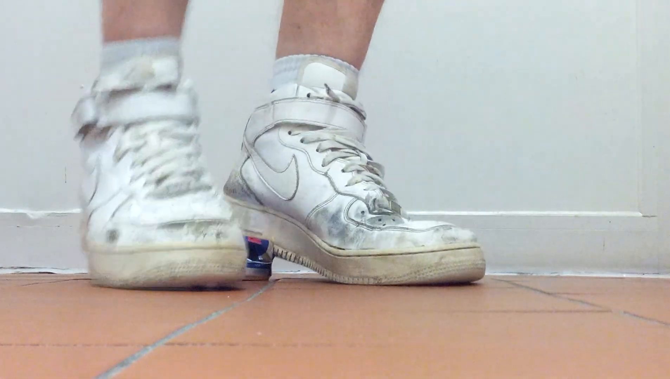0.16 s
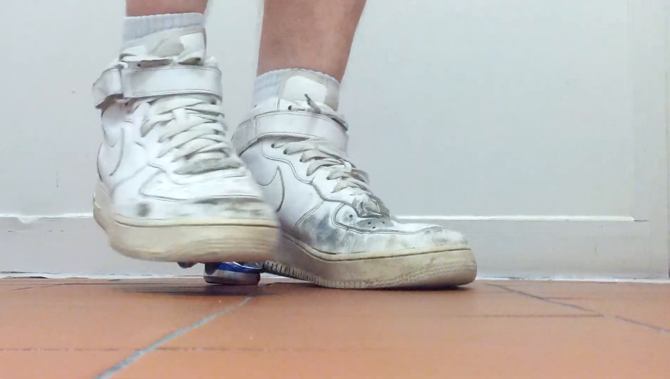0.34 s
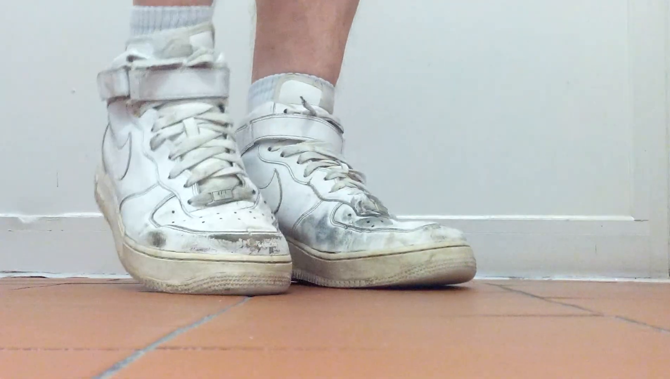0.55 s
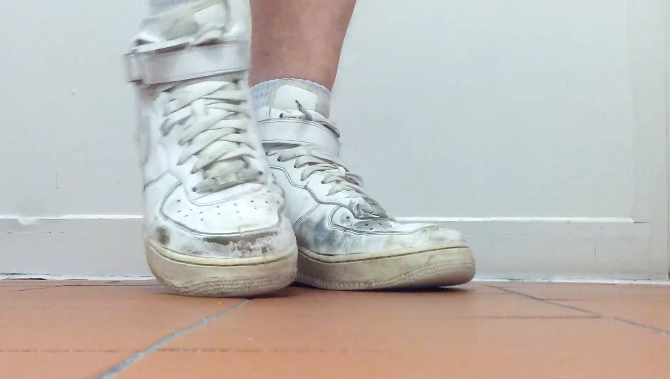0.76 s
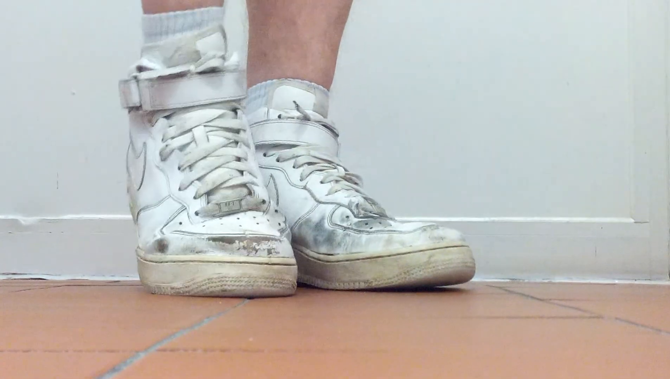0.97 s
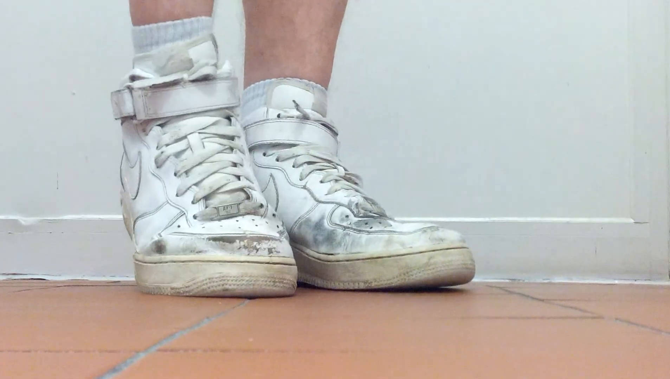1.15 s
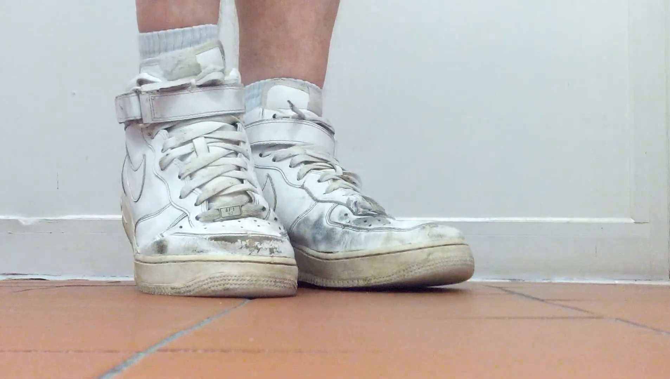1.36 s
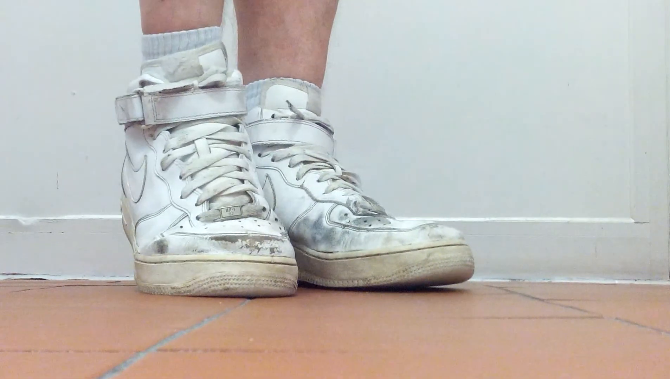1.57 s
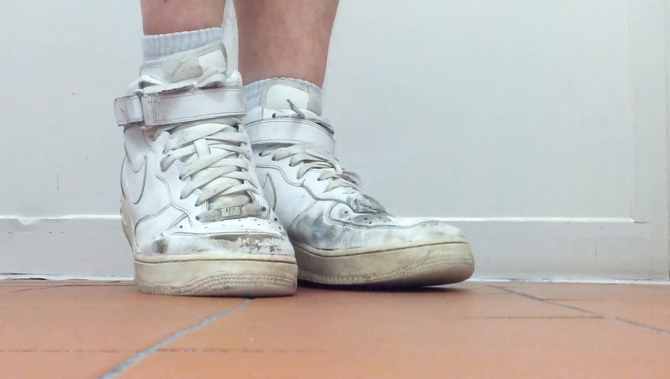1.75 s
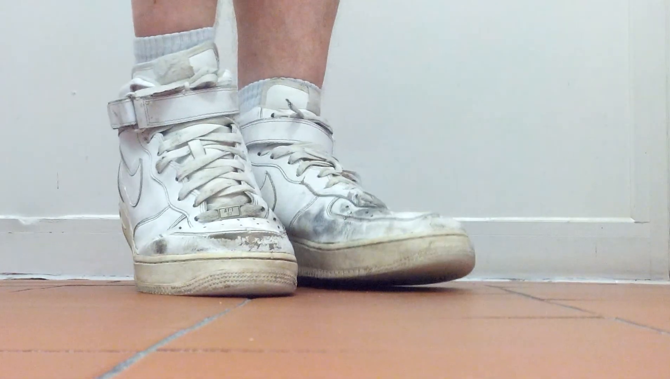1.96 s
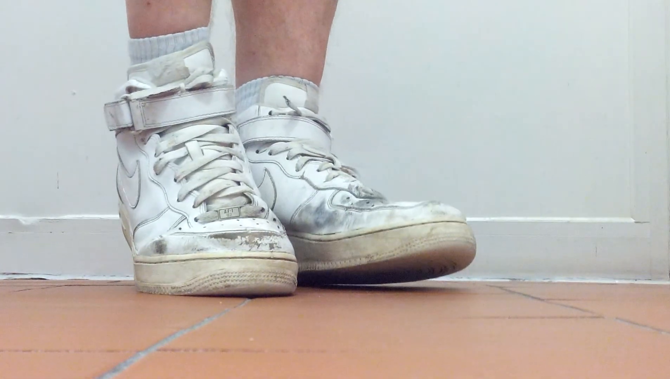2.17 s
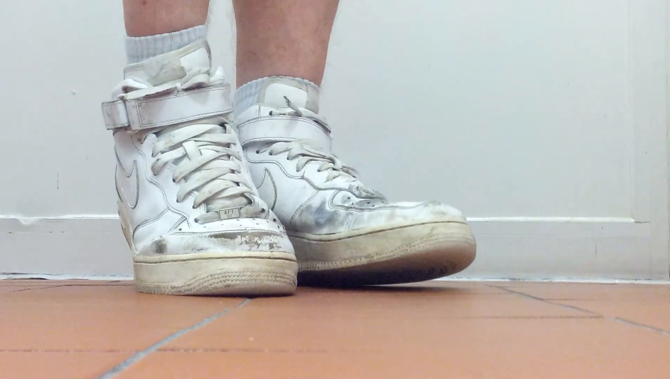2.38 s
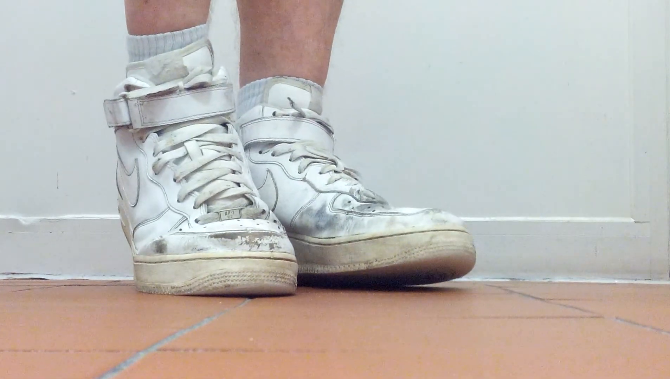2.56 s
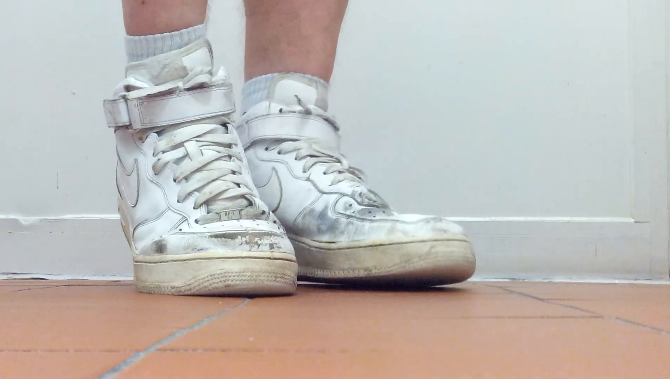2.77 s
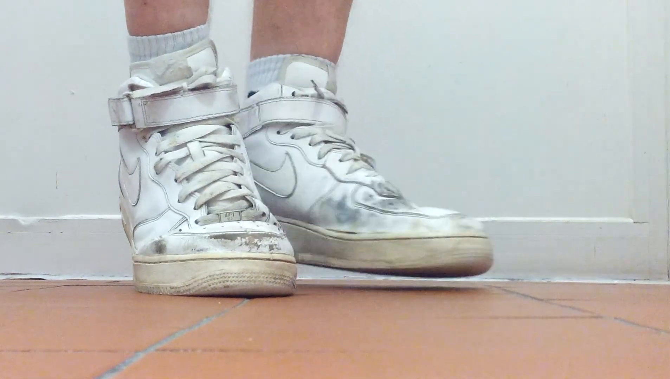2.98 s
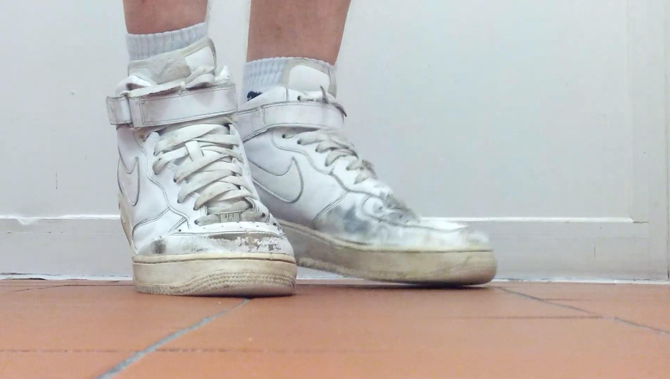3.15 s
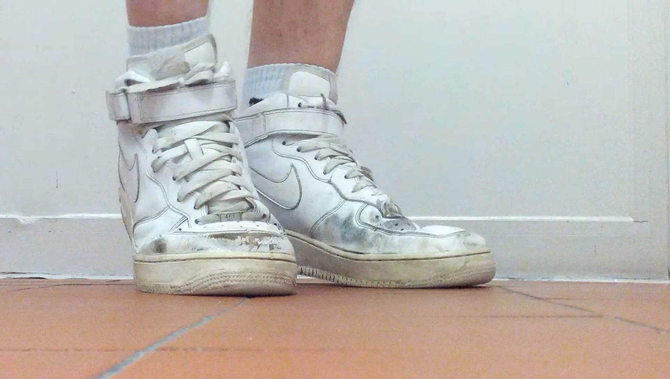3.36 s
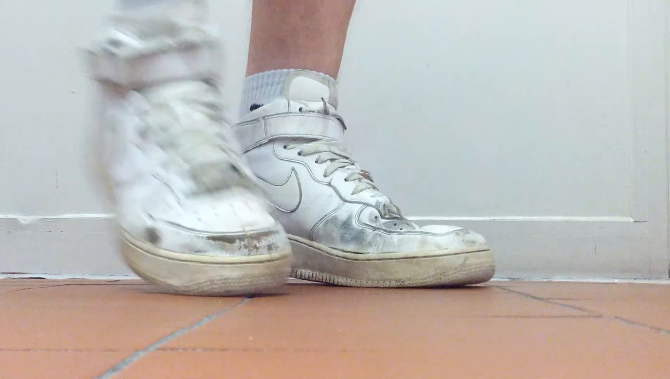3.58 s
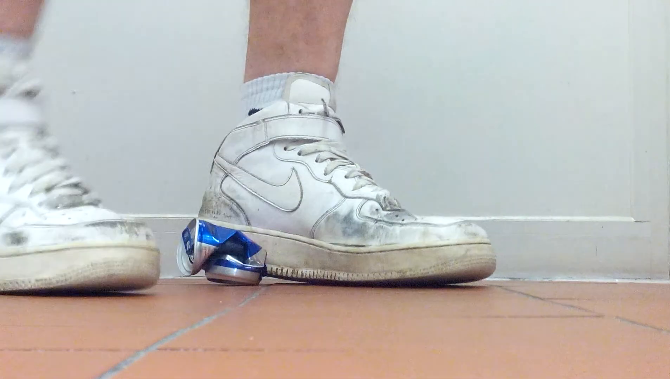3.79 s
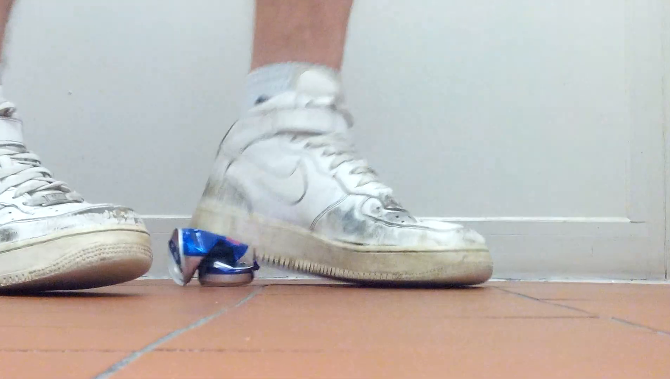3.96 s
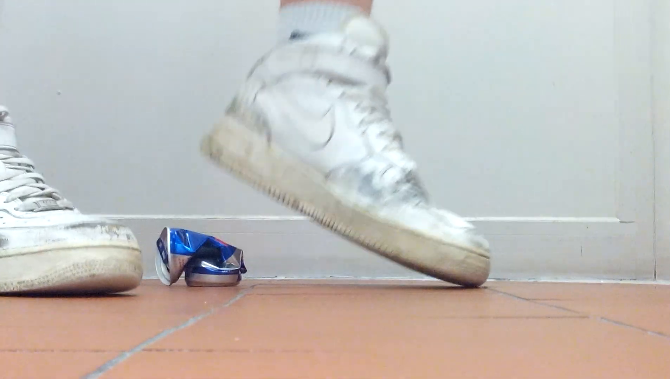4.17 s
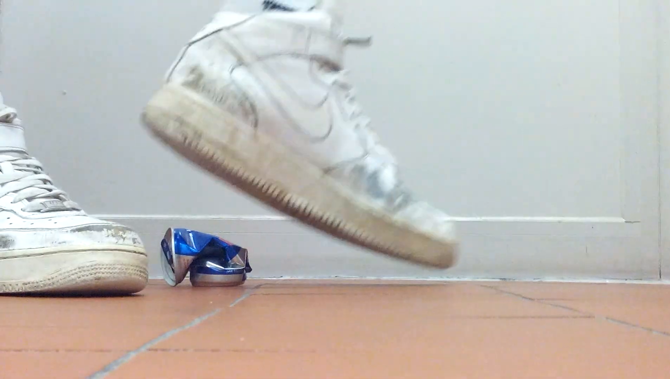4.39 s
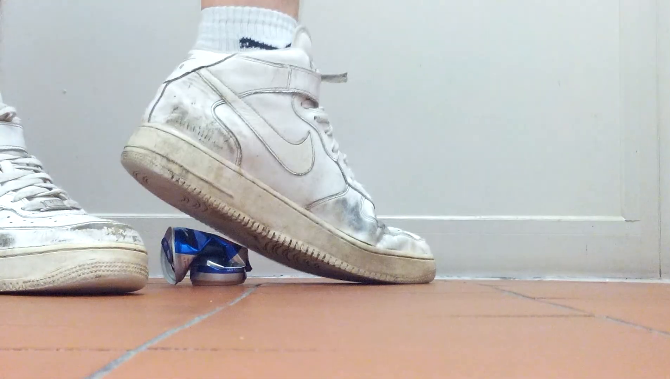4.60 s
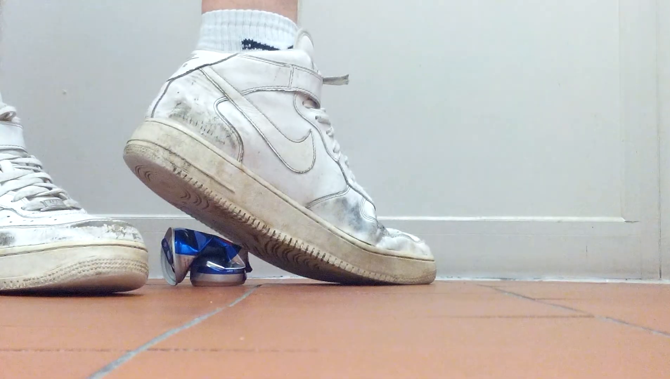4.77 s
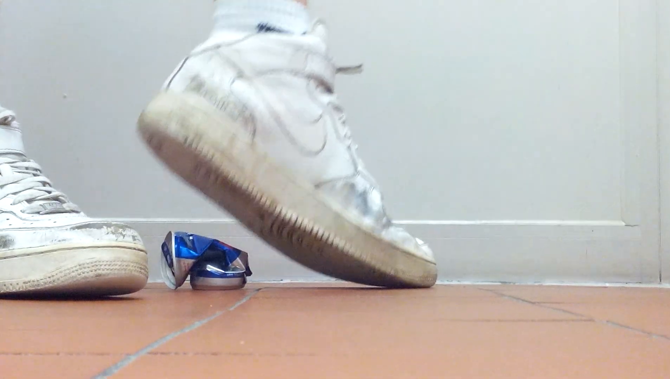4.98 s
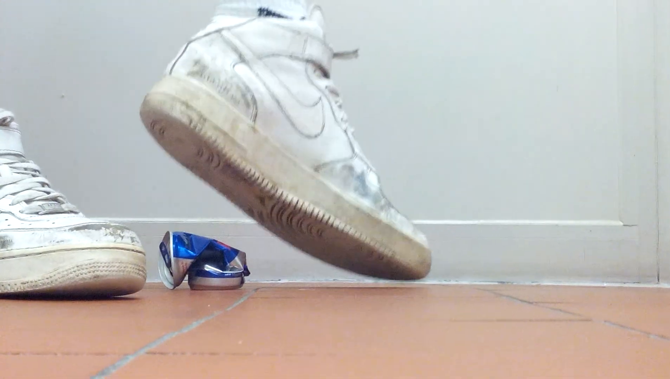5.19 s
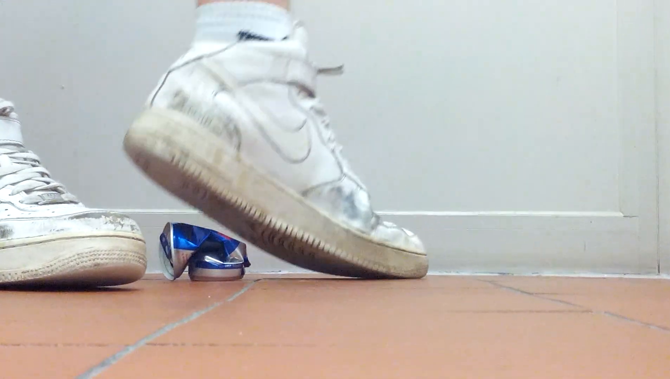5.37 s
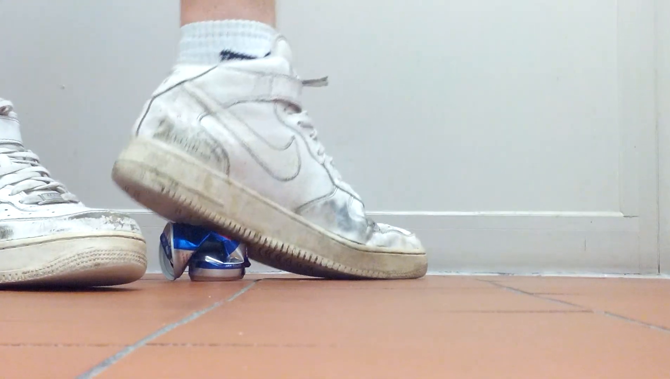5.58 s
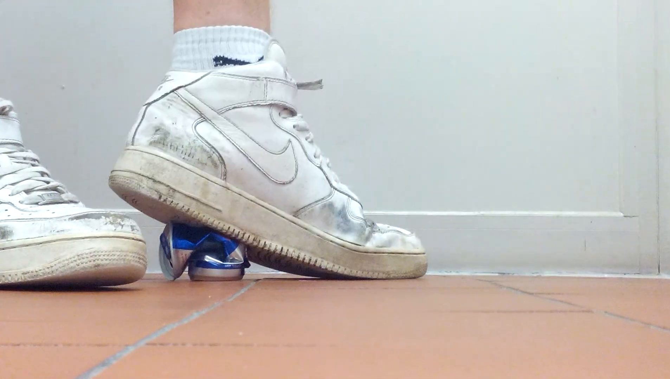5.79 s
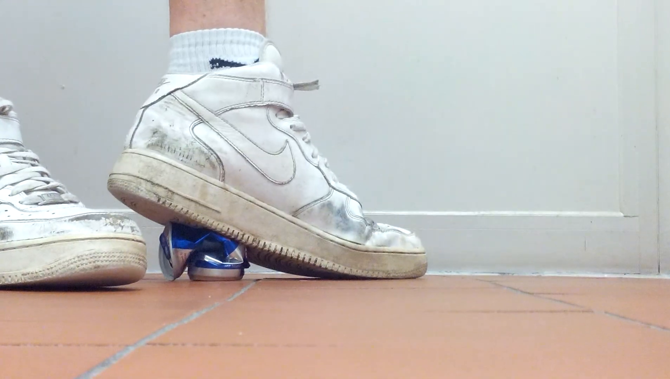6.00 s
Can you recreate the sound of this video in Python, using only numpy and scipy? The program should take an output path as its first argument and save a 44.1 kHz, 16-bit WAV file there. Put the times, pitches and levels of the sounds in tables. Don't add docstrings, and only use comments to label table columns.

```python
import sys
import numpy as np
from scipy import signal
from scipy.fft import rfft, irfft, next_fast_len
from scipy.io import wavfile
from scipy.ndimage import map_coordinates

SR = 44100
rng = np.random.default_rng(int(sys.argv[2]) if len(sys.argv) > 2 else 0)


def volts_from_decibels(level):
    exponent = np.asarray(level, float) / 20
    return 10 ** exponent


def output_pcm(signal):
    pcm = np.clip(np.atleast_2d(signal).T, -1, 1) * 32767
    wavfile.write(sys.argv[1], SR, np.round(pcm).astype(np.int16))


N = 266364
SPAN = 1 << 15


def unit(x):
    return x / np.sqrt(np.mean(np.abs(x) ** 2) + 1e-20)


def along(points, hz):
    f, v = np.transpose(points)
    return np.interp(np.log(hz + 1), np.log(f + 1), v)


def level(rows, rest_db=-120):
    t = np.arange(N) / SR
    power = volts_from_decibels(rest_db) ** 2
    for s, db, rise_s, fall_s in rows:
        away = np.maximum((s - t) / rise_s, (t - s) / fall_s)
        power = power + volts_from_decibels(db - 20 * away) ** 2
    return np.sqrt(power)


def pair(mid, side, wide_db):
    return np.array([mid + volts_from_decibels(wide_db) * side, mid - volts_from_decibels(wide_db) * side])


def noise(spectrum, wide):
    size = next_fast_len(N)
    hz = np.fft.rfftfreq(size, 1 / SR)
    mid, side = rfft(rng.standard_normal((2, size))) * volts_from_decibels(along(spectrum, hz))
    both = irfft(pair(mid, side, along(wide, hz)), size)[:, :N]
    return both / np.std(both.mean(axis=0))


def wobble(rate):
    return map_coordinates(rng.standard_normal(N // 64), [np.arange(N) * rate / SR])


# f/Hz, side minus mid level/dB
QUIET_WIDE = [(60, -17.5), (110, -24.5), (200, -17), (380, -9.5), (700, -5), (1290, -2.5), (2380, -3.5),
              (4400, 3.5), (8120, 8), (15000, 4.5)]
# f/Hz, level/dB per Hz
RUMBLE = [(12, -48.5), (20, -17.5), (38, -7), (103, -7), (135, -1), (166, -9.5), (232, -10), (260, -26.5),
          (305, -18), (375, -23), (406, -27.5), (595, -33.5), (900, -47.5), (1170, -67), (1980, -120)]
# t/s, level/dB, rise/s, fall/s
SWELLS = [
    (.3, -45.5, .2, .08),
    (1.15, -40.5, .9, 0.83),
    (4.1, -42.5, 0.71, .4),
    (5.35, -53, 0.27, 0.16),
    (6.04, -46.5, .4, .1),
]


def rumble():
    swell = level(SWELLS, rest_db=-48)
    lumps = unit(volts_from_decibels(1.9 * wobble(11.0)))
    return swell * lumps * noise(RUMBLE, QUIET_WIDE)


# f/Hz, level/dB per Hz
HISS = [(290, -28.5), (500, 1), (545, -9), (639, -12), (891, -8), (986, -16.5), (1110, -9.5), (1300, -15),
        (1350, -21), (1940, -13.5), (2560, -12.5), (3940, -11.5), (6820, -22.5), (12500, -13),
        (15800, -15.5)]


def hiss():
    return volts_from_decibels(-64) * noise(HISS, QUIET_WIDE)


# f/Hz, side minus mid level/dB
WIDE = [(60, -21.5), (110, -26), (200, -26), (380, -18.5), (700, -11), (1290, -7), (2380, -9), (4400, 0),
        (8120, 8), (15000, -2.5)]
# f/Hz, level/dB per Hz
RUBBER = [(500, -28), (1200, -1), (3000, -5.5), (5000, -2.5), (7000, -14.5), (14000, -47)]
# t/s of most pressure, level/dB, rise/s, fall/s
STROKES = [
    (.16, -66, 0.21, 0.37),
    (1.58, -56.5, 0.064, .1),
    (3.08, -44.5, .05, 0.28),
    (3.53, -51.5, 0.12, 0.08),
    (3.8, -61, 0.061, .15),
    (4.08, -55, 0.27, 0.042),
    (4.79, -55.5, 0.29, .12),
    (5.2, -70, .2, 0.39),
]
# f/Hz, level/dB per Hz
DRAG = [(210, -36), (350, -11.5), (535, -0.5), (957, -11), (1290, -3), (1460, -22.5), (1800, -4),
        (4130, -10.5), (4910, -24), (15000, -42)]
# t/s of most pressure, level/dB, rise/s, fall/s
SCRAPE = [
    (3.6, -41, 0.026, .2),
    (3.65, -42.5, 0.086, 0.14),
    (3.73, -41, 0.11, 0.108),
]


def scuff():
    grain = unit(volts_from_decibels(1.3 * wobble(39) + 2.6 * wobble(170)))
    sole = level(STROKES, rest_db=-69) * noise(RUBBER, WIDE)
    metal = level(SCRAPE) * noise(DRAG, WIDE) / np.sqrt(grain)
    return grain * (sole + metal)


# f/Hz, t60/s
ROOM = [(100, 0.22), (400, 0.48), (1500, 0.31), (4000, 0.29), (8000, 0.3), (14000, 0.26)]


def in_room(s, dry, wet_db, gap_s=0.0025):
    bins, t, z = signal.stft(rng.standard_normal((2, SPAN // 2)), SR, nperseg=256)
    decay = volts_from_decibels(-60 * t / along(ROOM, bins)[:, None])
    tail = signal.istft(z * decay, SR, nperseg=256)[1]
    tail *= 1 - np.exp(-np.arange(tail.shape[1]) / SR / gap_s)
    mid, side = volts_from_decibels(wet_db) * rfft(tail / np.linalg.norm(tail[0]), SPAN)
    hz = np.fft.rfftfreq(SPAN, 1 / SR)
    lag = 1j
    both = irfft(rfft(dry, SPAN) * pair(1 + mid, lag + side, along(WIDE, hz)), SPAN)
    early = 64
    return round(s * SR) - early, np.roll(both, early, axis=1)


# t/s, level/dB, f/Hz, t60/s
THUDS = [(0.276, -38.5, 172, 0.0083), (0.319, -14, 290, 0.021), (0.367, -6.5, 110, 0.017),
         (0.637, -21, 140, 0.029), (1.28, -34.5, 120, 0.011), (1.357, -31.5, 181.1, 0.031),
         (1.976, -46.5, 190, 0.057), (2.48, -50, 125.6, 0.044), (2.931, -29, 185.9, 0.0089),
         (3.328, -19.5, 118, 0.016), (3.785, -41, 139.5, 0.18), (3.961, -29, 135, 0.045),
         (4.009, -26.5, 130.2, 0.013), (4.627, -27, 120, 0.026), (4.949, -46, 68.5, 0.035),
         (5.385, -23.5, 125, 0.034), (5.778, -37, 133, 0.051)]
# t/s, level/dB, f/Hz, t60/s
WEIGHT = [
    (.33, -22, 101, 0.14),
    (2.948, -37.5, 100, 0.044),
]


def steps():
    t = np.arange(SPAN // 4) / SR
    for s, db, pitch_hz, t60 in THUDS + WEIGHT:
        swing = np.sin(2 * np.pi * pitch_hz * t)
        swing = swing + 0.09 * np.sin(2 * np.pi * 2.2 * pitch_hz * t)
        soft_start = 1 - np.exp(-t / 0.002)
        yield in_room(s, swing * volts_from_decibels(db + 0.5 - 60 * t / t60) * soft_start, wet_db=9.5)


def modes(peaks, hz):
    total = 0
    for k, (c, w, db) in enumerate(peaks):
        damping = 1j * hz * abs(w)
        total = total + (-1) ** k * volts_from_decibels(db) * damping / (c * c - hz * hz + damping)
    return unit(total)


def causal(gain):
    fold = irfft(np.log(gain + 1e-6))
    fold[1:len(gain) - 1] *= 2
    fold[len(gain):] = 0
    return np.exp(rfft(fold))


def snap(db, parts, crumple_s):
    t, hz = np.arange(SPAN // 2) / SR, np.fft.rfftfreq(SPAN // 2, 1 / SR)
    slips = 0.25 * rng.standard_normal(len(t)) ** 2 * np.sign(rng.random(len(t)) - 0.5)
    slips *= volts_from_decibels(-60 * (t / crumple_s) ** 2)
    slips[0] = 1
    force = rfft(slips)
    colour = np.sqrt(sum(np.abs(part) ** 2 for part in parts(hz)))
    ring = irfft(force * causal(colour / (np.abs(force) + 0.3) ** 0.63))
    ring = ring * volts_from_decibels(-60 * np.maximum(t - crumple_s, 0) / 0.14)
    return volts_from_decibels(db + 2) * ring / np.abs(ring).max()


def settling(ring):
    per_s, fade_s, grit_db, scatter_db = 90, 0.089, -23, 6
    t = np.arange(len(ring)) / SR
    draw = rng.random((2, len(t)))
    crease_db = grit_db - scatter_db * np.log(draw[1] + 1e-3) - 20 * t / fade_s
    grit = (draw[0] < per_s / SR) * volts_from_decibels(crease_db)
    grit[0] = 1
    return signal.fftconvolve(ring, grit)[:len(t)]


# f/Hz, width/Hz, level/dB
HOLLOW = [
    (341, 110, -1),
    (460.2, 120, 5.5),
    (694, 700, 0),
]
# f/Hz, width/Hz, level/dB
EDGES = [
    (9300, 4600, -1.5),
    (11650, 2100, 2),
]
# f/Hz, level/dB per Hz
CRACK = [(150, -53.5), (280, -22.5), (1000, -19), (1800, -15.5), (3800, -3), (7800, -21.5), (11500, -35),
         (15500, -47)]
# t/s, peak level/dB, room share/dB, hollow body/dB, sizzle/dB
BUCKLES = [(0.3148, 0, 2.5, -13, -15), (0.5183, -18, -3, -18.5, -44.5), (0.7019, -0.5, -2, -22, -7.5),
           (0.85, -2.5, -5, -18.5, -21), (1.0891, 1, 1, -15.5, -22), (1.229, -10, 1.5, -14.5, -34.5),
           (1.291, 5.5, 2, -16.5, -13.5), (1.3618, 5.5, 0.5, -7.5, -11.5), (2.9329, 3.5, -2, -17, -16),
           (3.5548, -13, -0.5, -14.5, -36.5), (4.1132, -1, 3.5, -18, -23), (5.7788, -7.5, 2, -19, -26.5)]
# f/Hz, width/Hz, level/dB
DENTS = [
    [(350, 56, 3), (3540, 900, -6), (1100, 350, -13)],
    [(3350, 400, 4.5), (2500, 600, 5.5)],
    [(4440, 150, 7), (5000, 130, -2), (5700, 700, 0.5)],
    [(3400, 250, 4.5), (4430, 450, 2.5), (1540, 180, -17)],
    [(1284, 160, 2.5), (1550, 74, 4), (1780, 74, 3), (460, 90, -6), (2820, 99, -5), (5030, 1800, -6.5)],
    [(1544, 170, -0.5), (2170, 250, 4), (480, 80, -2.5)],
    [(3203, 250, 0), (1570, 250, 1), (4400, 220, -2), (5800, 1200, -5)],
    [(1600, 550, 2.5), (3500, 240, -0.5), (1050, 320, -4), (6000, 1000, 0)],
    [(2890, 200, 10), (4310, 130, 1), (1590, 200, -7), (6090, 400, -6)],
    [(2023, 300, -0.5), (4200, 470, 1), (1250, 180, -4)],
    [(1930, 24, 3), (2800, 120, -1.5), (3400, 500, -3.5)],
    [(1777, 90, 5.5), (2800, 200, 3.5), (4060, 450, -8.5)],
]


def buckles():
    for (s, db, wet_db, body_db, sizzle_db), dents in zip(BUCKLES, DENTS):
        skirts = [(c, 0.4 * c, top_db) for c, w, top_db in dents]
        ring_db = max(top_db for c, w, top_db in dents) + 1.0
        slope_db = 0.27 * (sizzle_db + 14)

        def parts(hz):
            dull = volts_from_decibels(slope_db * np.log2(1 + (hz / 3500) ** 2) / 2)
            return [unit(dull * volts_from_decibels(along(CRACK, hz))),
                    volts_from_decibels(-9) * unit(dull * modes(skirts, hz) ** 2),
                    volts_from_decibels(ring_db) * unit(dull * modes(dents, hz) ** 1.1),
                    volts_from_decibels(body_db) * unit(modes(HOLLOW[:-1], hz) ** 1.5),
                    volts_from_decibels(sizzle_db + 4.5) * unit(modes(EDGES, hz) ** 1.5)]

        yield in_room(s, settling(snap(db, parts, crumple_s=0.011)), wet_db)


# t/s, peak level/dB, dent f/Hz, hollow body/dB, sizzle/dB
CREASES = [(0.3332, -5.5, 3960, -18, -21), (0.3662, -7.5, 1224, -1.5, -23),
           (0.3932, -10.5, 2010, -9.5, -35), (0.752, -21.5, 4850, -33, -25.5),
           (0.7987, -15, 3760, -35, -25.5), (0.809, -24.5, 1306, 8.5, -29.5),
           (1.068, -14.5, 3100, -13.5, -38.5), (1.0745, -17.5, 3034, -7.5, -37),
           (2.9366, -8, 2896, -39.5, -36.5), (4.119, -9, 2800, -23.5, -27.5)]
# t/s, peak level/dB, dent f/Hz, hollow body/dB, sizzle/dB
TICKS = [(0.6423, -27, 3160, -2, -33.5), (1.7499, -46.5, 1750, -6.5, -17), (1.838, -37.5, 3870, -25, -22),
         (3.1608, -20.5, 4150, -25, -19), (3.256, -27, 4200, -33, -22), (3.3306, -33, 2460, 6, -19),
         (3.462, -47, 1840, -1.5, -22.5), (3.855, -33, 4140, -44.5, -10), (3.8964, -34, 4200, -23.5, -11.5),
         (3.962, -44.5, 1501, 7, -26.5), (4.6277, -35, 2700, -6.5, -38), (4.7379, -34, 3400, -10.5, -30),
         (4.8416, -46.5, 3780, -19.5, -23), (4.8782, -47.5, 3770, -23, -19), (5.0774, -51, 3435, -5, -18),
         (5.3951, -35, 3180, -1.5, -33), (5.5168, -47.5, 3470, -13, -17), (5.68, -47.5, 4930, -17.5, -30)]
# t/s, peak level/dB, dent f/Hz, hollow body/dB,
# length/s
SLIPS = [(2.892, -49.5, 3400, -10, 0.034), (3.126, -42, 4000, -3, 0.018), (3.139, -31, 4210, -26, 0.06),
         (3.149, -30, 4370, -16, .04), (3.498, -49, 2500, 1, .05), (3.518, -38.5, 2800, -5, 0.057),
         (3.696, -38, 2174, -9, .027), (3.703, -29.5, 3980, -26, 0.024), (4.0949, -26, 2516, -2.5, .05),
         (4.136, -10.5, 2048, -15, 0.08), (4.25, -24.5, 2946, -10.5, 0.056),
         (1.405, -11.5, 3310, -13.5, .1), (1.318, -11, 4200, -18.5, 0.074)]


def small_dents():
    tick_s, slip_sizzle_db = 0.007, -20.5
    rows = [(*row, tick_s) for row in CREASES + TICKS]
    rows += [(*row, slip_sizzle_db, length_s) for *row, length_s in SLIPS]
    for s, db, dent_hz, body_db, sizzle_db, crumple_s in rows:

        def parts(hz):
            panel = modes([(dent_hz, dent_hz, 0)], hz) ** 2.4
            return [unit(panel / (1 + (hz / 6500) ** 4)),
                    volts_from_decibels(-6) * unit(modes([(dent_hz, 500, 0)], hz) ** 2),
                    volts_from_decibels(body_db + 1.5) * unit(modes(HOLLOW, hz) ** 3.3),
                    volts_from_decibels(sizzle_db + 1.5) * unit(modes(EDGES, hz) ** 1.8)]

        yield in_room(s, snap(db, parts, crumple_s), wet_db=1.0)


def scene():
    hits = np.zeros((2, N + SPAN))
    for start, sound in [*buckles(), *small_dents(), *steps()]:
        hits[:, start:start + SPAN] += sound
    small_hz = 88
    hits = signal.sosfilt(signal.butter(2, small_hz, "high", fs=SR, output="sos"), hits[:, :N])
    return hits + volts_from_decibels(-1.5) * scuff() + rumble() + hiss()


def low_pass(x):
    return signal.sosfilt(signal.butter(12, 15910, fs=SR, output="sos"), x)


def record(dry):
    ceiling, low_hz, high_hz = 0.98, 45, 18000
    x = signal.sosfilt(signal.butter(2, low_hz, "high", fs=SR, output="sos"), dry)
    x = signal.sosfilt(signal.butter(2, high_hz, fs=SR, output="sos"), x)
    mix = x / (1 + np.abs(x / ceiling) ** 6) ** (1 / 6)
    return low_pass(mix)


dry = scene()
out = record(dry)
output_pcm(out)
```